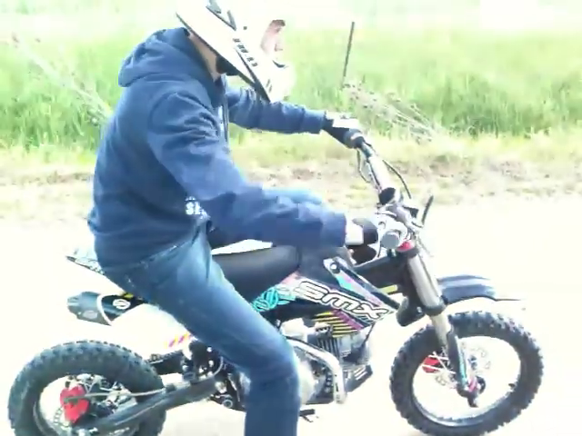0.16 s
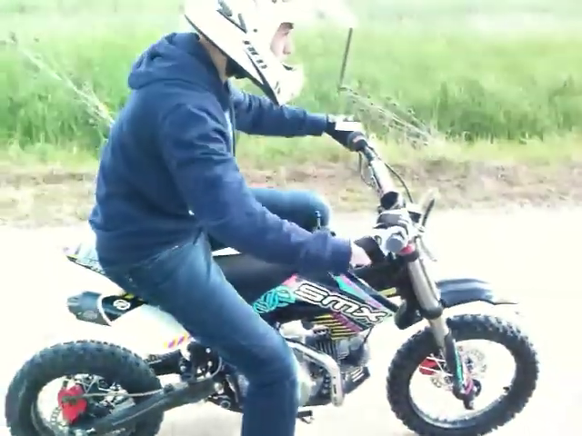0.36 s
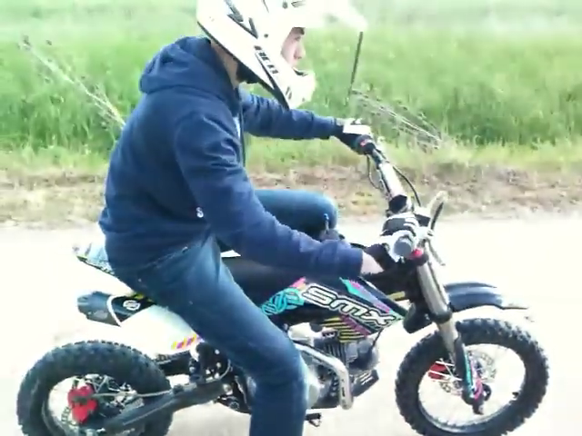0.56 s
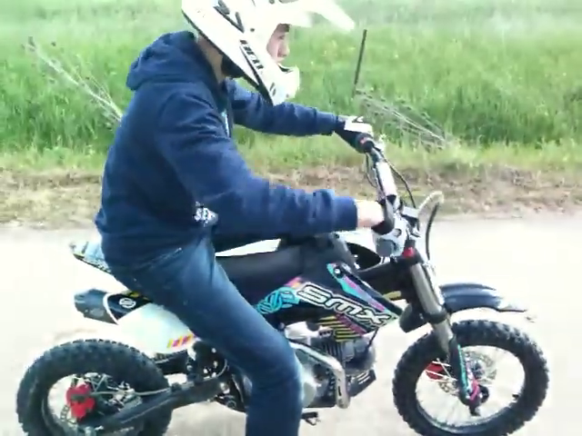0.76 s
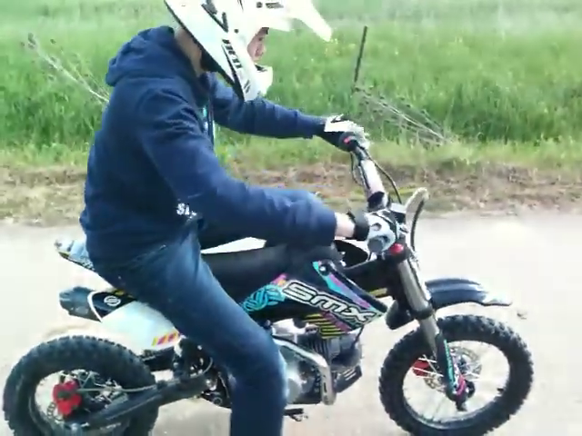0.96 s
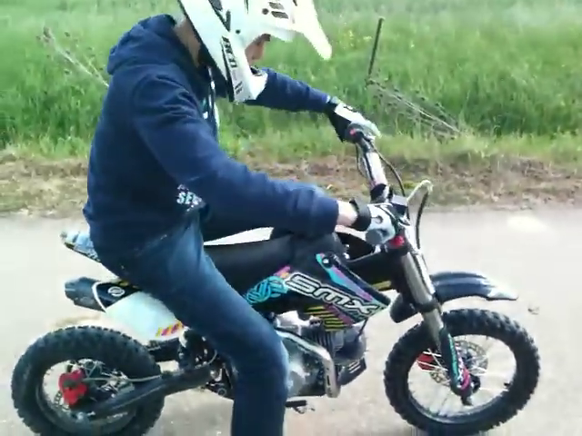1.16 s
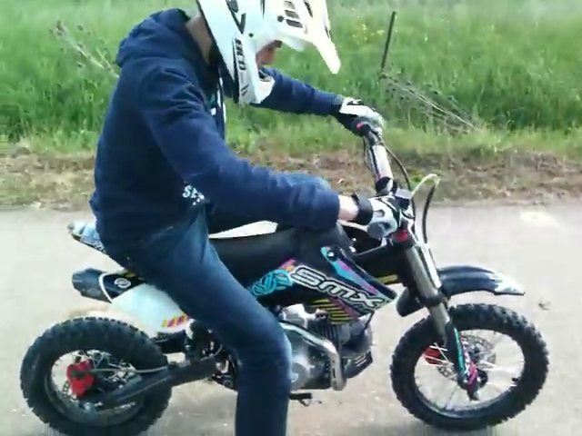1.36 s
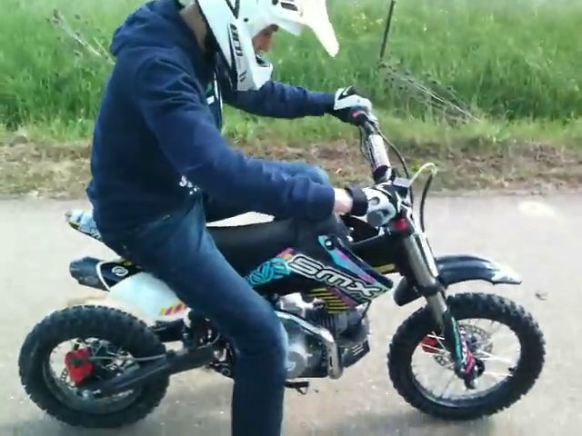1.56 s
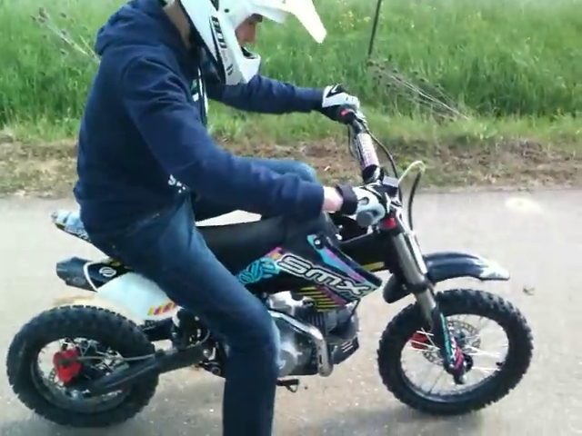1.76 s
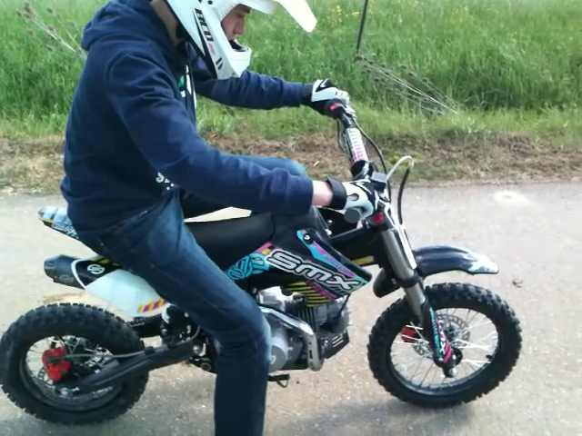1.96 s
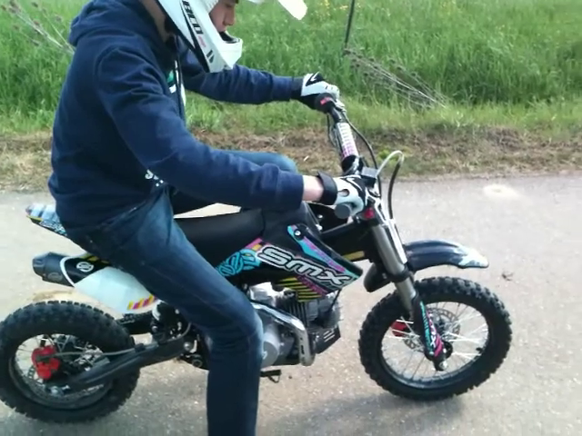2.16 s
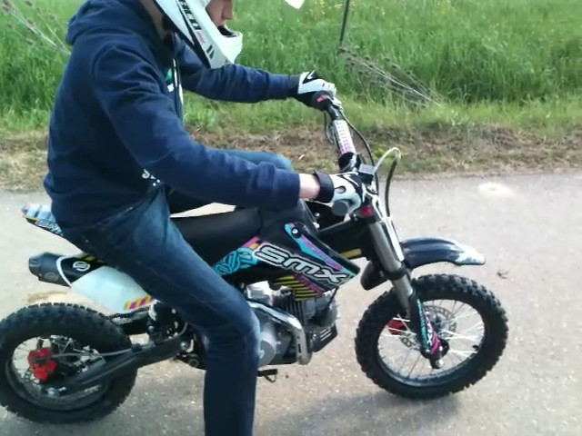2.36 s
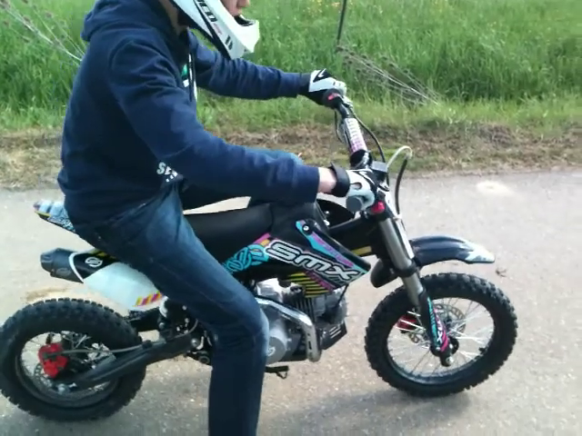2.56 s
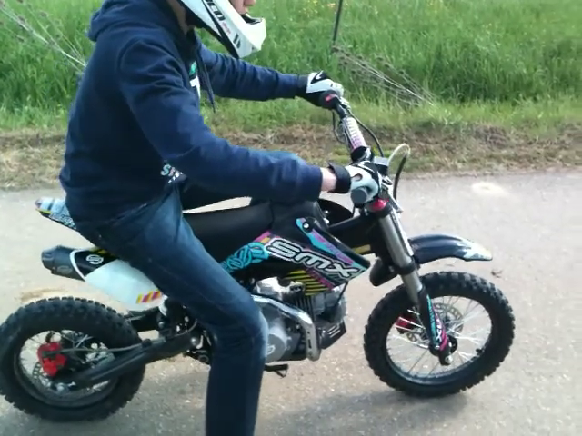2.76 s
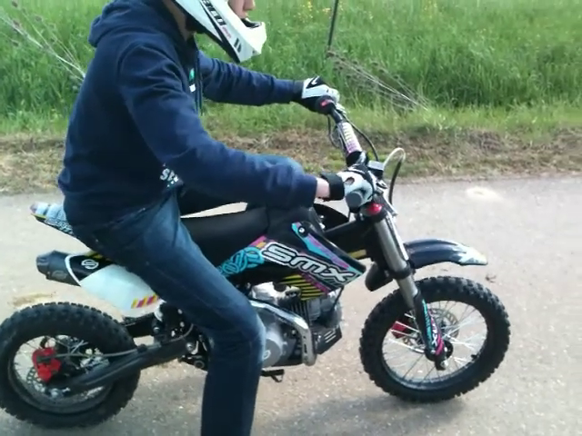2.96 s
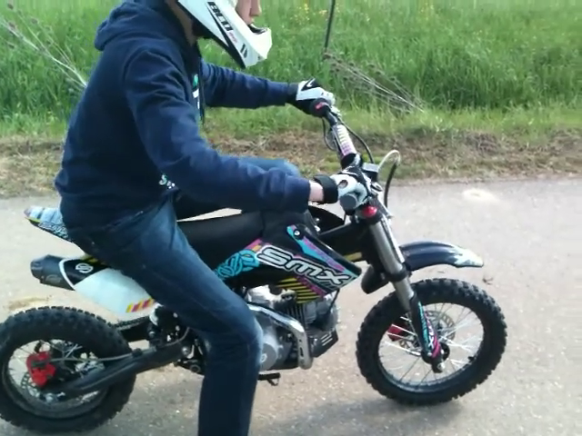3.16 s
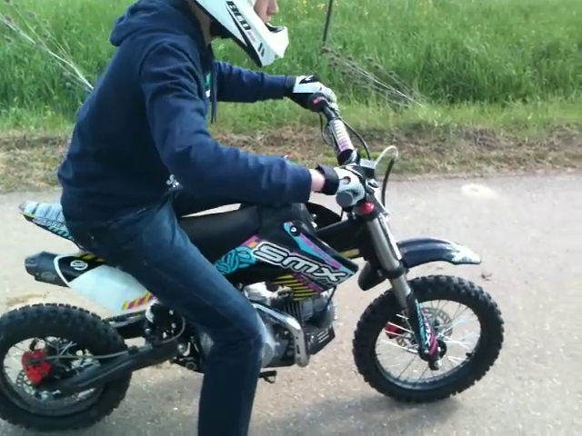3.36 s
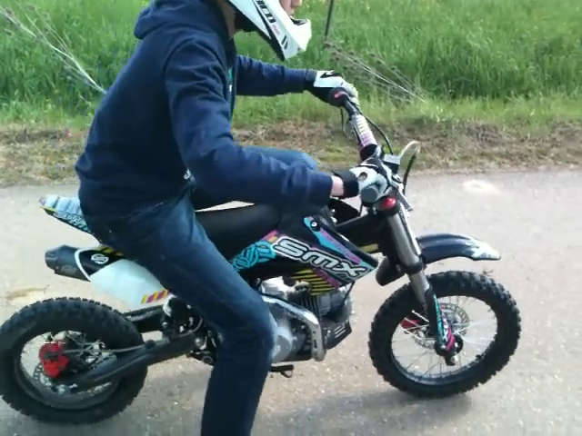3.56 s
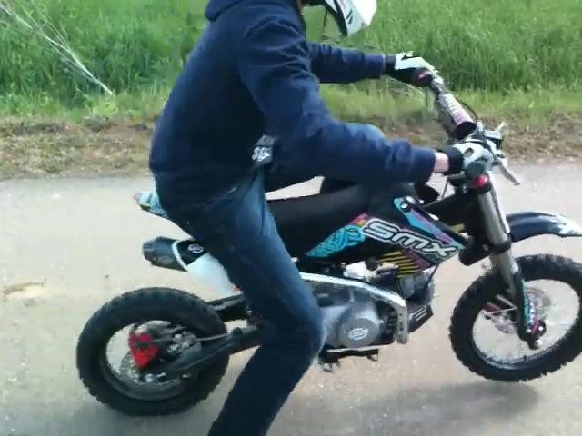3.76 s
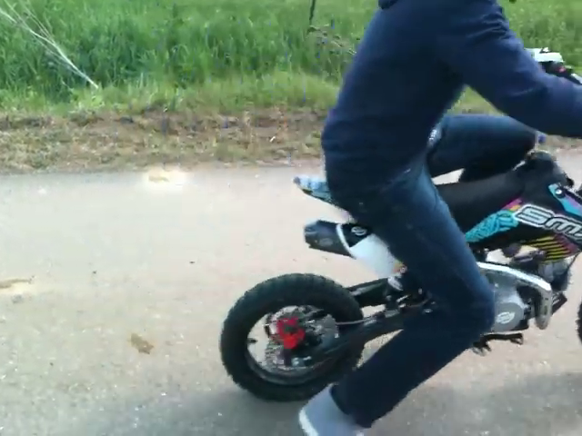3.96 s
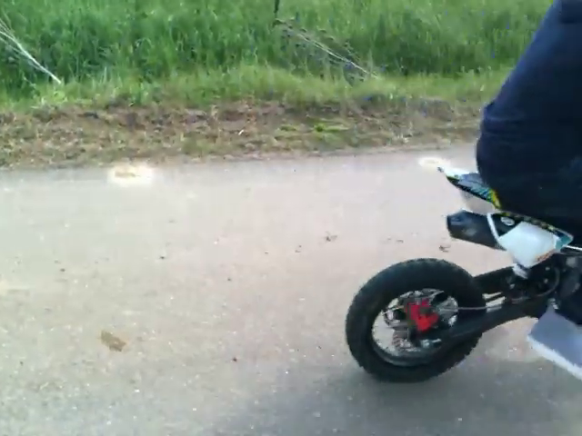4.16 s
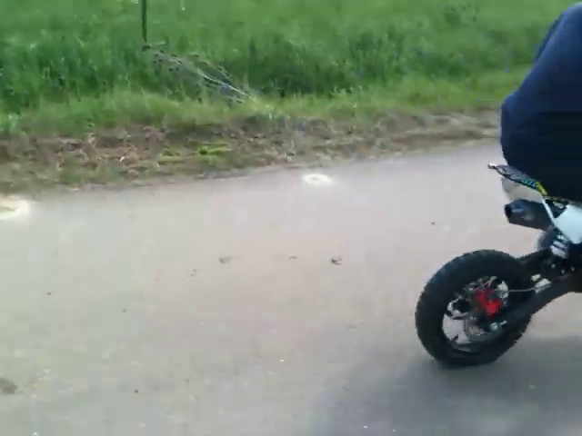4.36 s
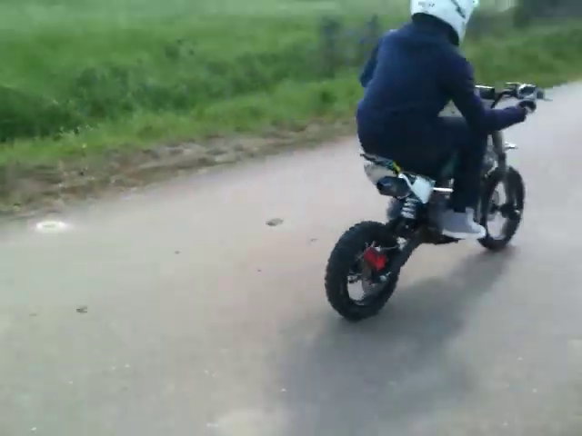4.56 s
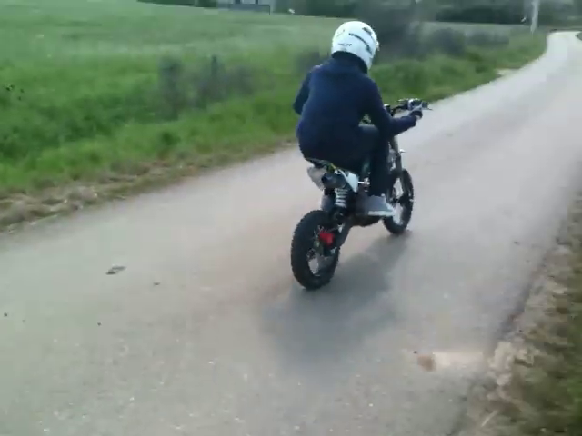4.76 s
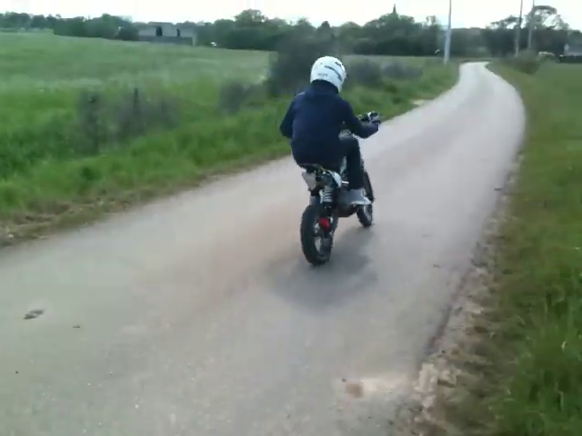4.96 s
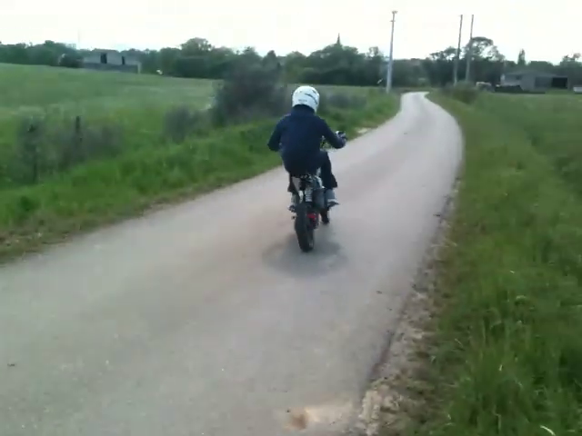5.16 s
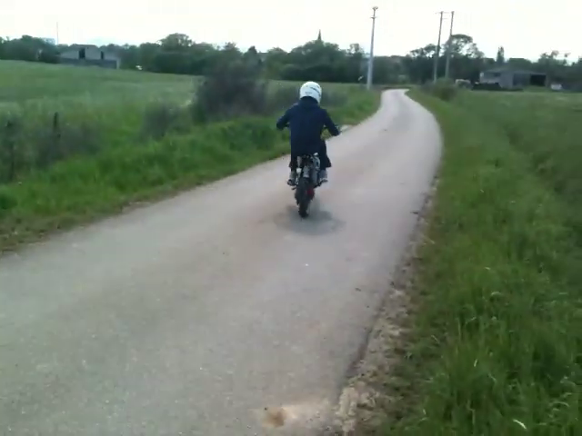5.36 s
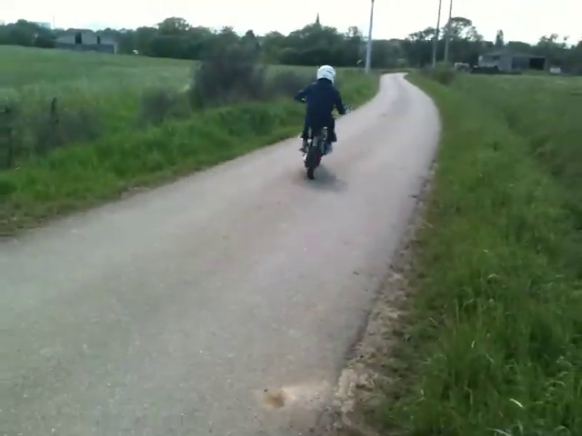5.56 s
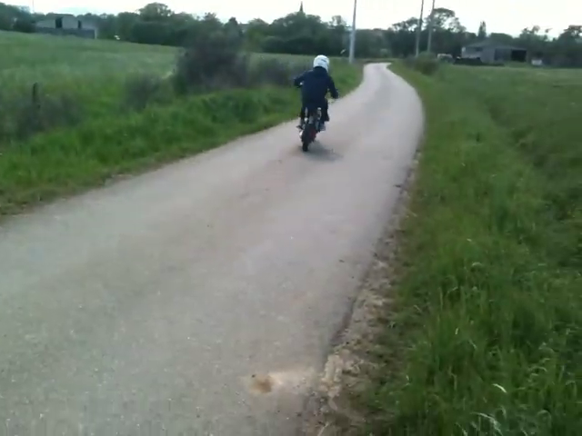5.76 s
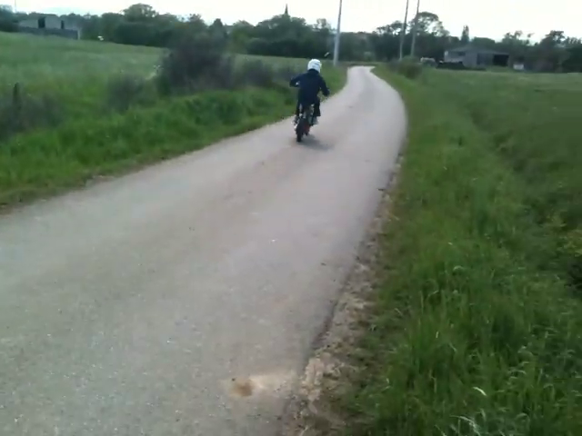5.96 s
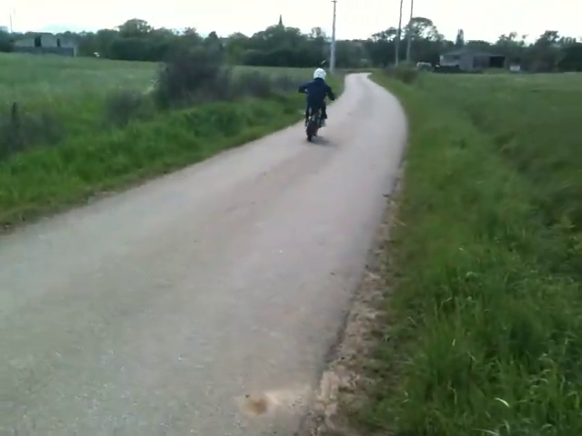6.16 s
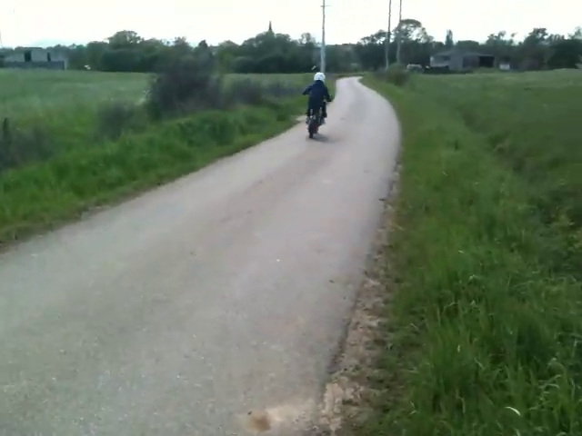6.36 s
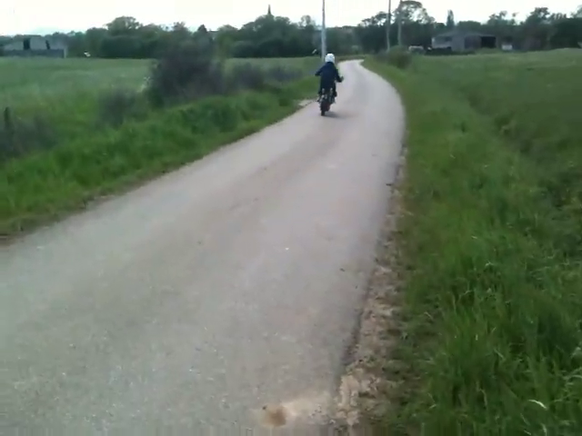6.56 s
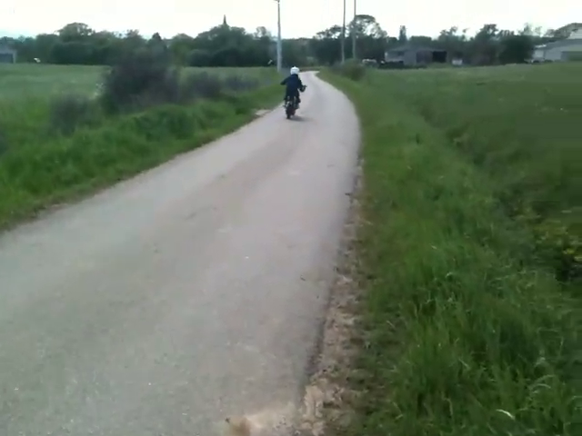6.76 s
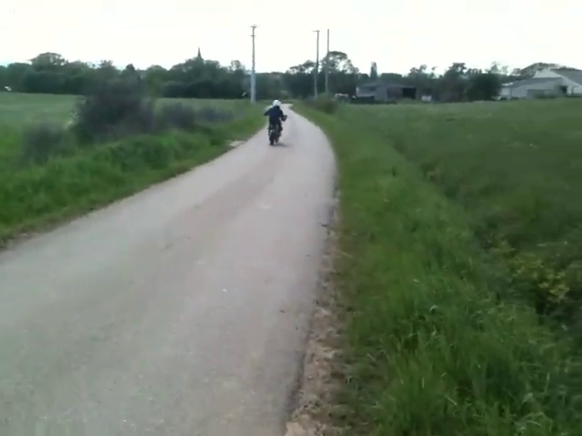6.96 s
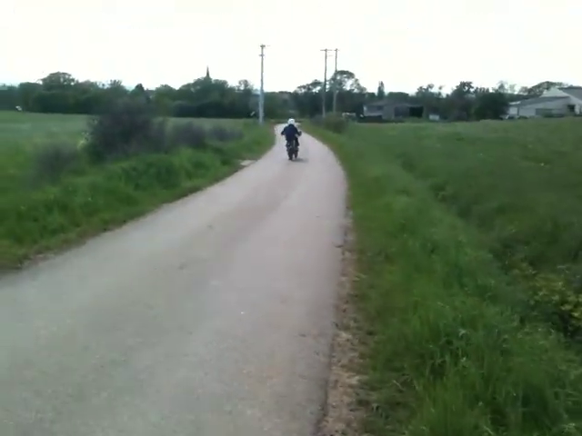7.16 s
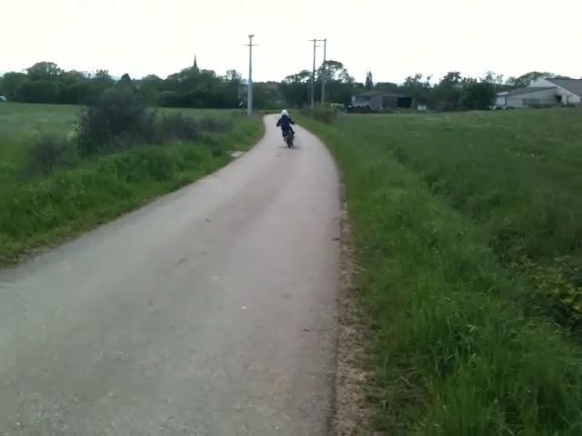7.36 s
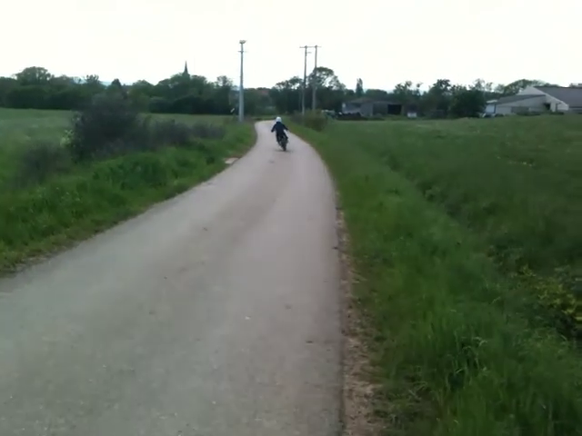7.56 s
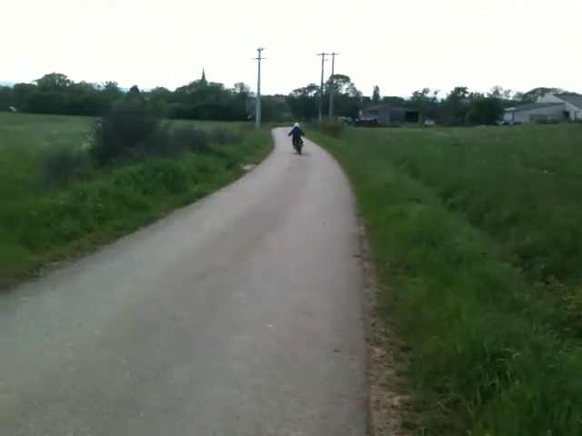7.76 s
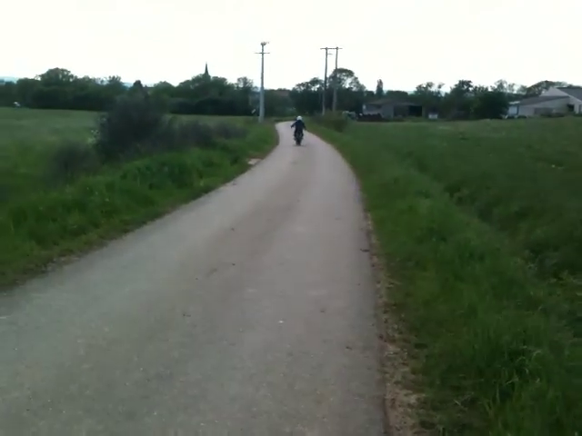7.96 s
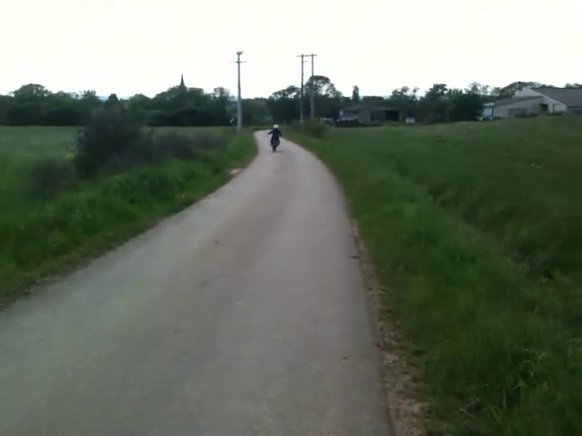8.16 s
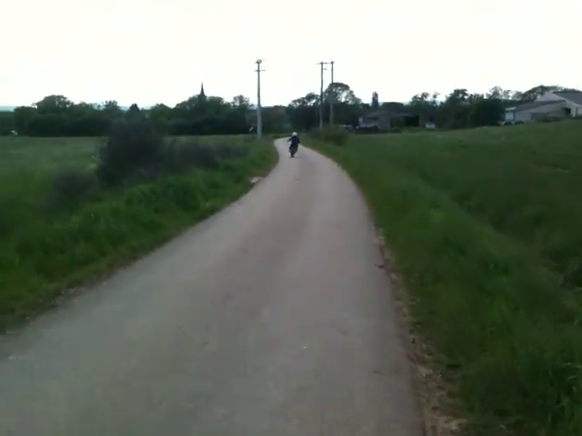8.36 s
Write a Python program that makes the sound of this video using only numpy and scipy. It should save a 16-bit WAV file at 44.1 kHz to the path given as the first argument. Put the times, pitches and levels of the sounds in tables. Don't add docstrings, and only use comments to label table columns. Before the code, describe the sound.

A small single-cylinder motorbike is revved twice with sharp barks and backfire pops, idles with a rattle, then accelerates hard away down a lane.

```python
import sys
import numpy as np
from scipy import signal
from scipy.io import wavfile
from scipy.ndimage import uniform_filter1d, map_coordinates

SR = 44100
rng = np.random.default_rng(int(sys.argv[2]) if len(sys.argv) > 2 else 0)


def inscribe(sig):
    pcm = np.round(np.clip(np.atleast_2d(sig).T, -1, 1) * 32767)
    wavfile.write(sys.argv[1], SR, pcm.astype(np.int16))


def voltage_ratio(level):
    return 10 ** (np.asarray(level, float) / 20)


N = 371763
T = np.arange(N) / SR
CLOCK = np.arange(0, N + 64, 32) / SR


def evened(x):
    return x / np.sqrt(np.mean(x ** 2) + 1e-20)


def curve(rows, s):
    return np.interp(s, np.transpose(rows)[0], np.transpose(rows)[1])


def fine(control):
    return np.interp(T, CLOCK, control)


def softened(x, hz):
    return signal.sosfiltfilt(signal.butter(2, hz, fs=SR, output="sos"), x)


def thin(points):
    return [(60, -45.5)] + list(points) + [(20000, -41)]


def coloured(x, points):
    hz, db = np.transpose(points)
    f = np.abs(np.fft.fftfreq(8192, 1 / SR))
    gain_db = np.interp(np.log(f + 1), np.log(hz), db)
    log_gain = np.log(voltage_ratio(np.maximum(gain_db, -100)))
    phase = -signal.hilbert(log_gain).imag
    taps = np.fft.ifft(np.exp(log_gain + 1j * phase)).real[:2048]
    return signal.oaconvolve(x, taps / np.linalg.norm(taps))[:N]


def ringing(x, modes):
    t = np.arange(2048) / SR
    taps = np.zeros(2048)
    for k, (hz, width_hz, db) in enumerate(modes):
        decay = np.sqrt(width_hz) * np.exp(-np.pi * width_hz * t)
        taps += (-1) ** k * voltage_ratio(db) * decay * np.sin(2 * np.pi * hz * t)
    return signal.oaconvolve(x, taps / np.linalg.norm(taps))[:N]


def clicks(s, size):
    at = s * SR
    index = np.floor(at).astype(int)[:, None] + np.arange(-8, 9)
    offset = index - at[:, None]
    out = np.zeros(N + SR)
    np.add.at(out, index + 16, size[:, None] * np.sinc(offset) * np.cos(np.pi * offset / 18) ** 2)
    return out[16:N + 16]


# time in seconds, distance in m.
DISTANCE_M = [(0, 2), (3.7, 2), (4.3, 3), (4.7, 5.5), (5, 8), (5.5, 12), (6, 18), (6.5, 33), (7, 50),
              (7.5, 64), (8.43, 100)]


def distance(s):
    return curve(DISTANCE_M, s)


# opens in seconds, shut in seconds, roll-on in seconds,
# roll-off in seconds, opening 0-1.
GRIP_TWISTS = [
    (-.03, .172, .05, .025, 1),
    (.268, .79, .04, .022, 1),
    (3.04, 3.345, .1, .075, .84),
    (3.59, 4.015, .03, .065, .86),
    (4.115, 9, .035, .05, 1),
]


def throttle():
    opening = np.zeros(len(CLOCK))
    for opens, shut, on, off, wide in GRIP_TWISTS:
        opening += wide * np.clip((CLOCK - opens) / on, 0, 1) * np.clip((shut - CLOCK) / off, 0, 1)
    return opening


def free():
    return throttle() * (CLOCK < GRIP_TWISTS[1][1])


# time in seconds, firings per second gained each second.
CRANK_PULL = [(0.0, 80.67), (0.158, 10.67), (0.289, 98.95), (0.37, 105.92), (0.65, 66.78), (0.785, 1.77),
              (1.71, -4.65), (2.04, 4.62), (2.365, -16.45), (2.537, 11.94), (2.77, 4.66), (3.07, 91.72),
              (3.305, -13.25), (3.625, 30.03), (3.7, -44.38), (3.788, 45.86), (3.956, -41.01),
              (4.04, 11.99), (4.118, 90.1), (4.27, 67.66), (4.47, 80.41), (5.22, 69.75), (5.67, 84.02),
              (6.036, 69.06), (6.254, -127.62), (6.39, -10.9), (6.493, 51.35), (6.73, 60.63), (7.83, 56.06),
              (8.259, 66.28)]


def speed():
    start_rate, drag_s = 61.41, 1.5
    s, pull = np.transpose(CRANK_PULL)
    since = np.maximum(CLOCK[:, None] - s, 0)
    steps = np.diff(pull, prepend=0) * drag_s
    return start_rate * np.exp(-CLOCK / drag_s) + (1 - np.exp(-since / drag_s)) @ steps


def turns():
    return np.cumsum(fine(speed())) / SR + .08


# time in seconds,
# level in dB.
AWAY_DB = [(4.5, 2), (5.1, -0.66), (5.8, -0.52), (6.25, -2), (6.65, -7.5), (7, -7), (7.5, -8), (8, -6.5),
           (8.43, -7)]


def level(shut_db, shut_rise, open_db, open_rise, top, share, far_db):
    octaves, grip = np.log2(speed() / 40), throttle()
    firing = open_db + open_rise * np.minimum(octaves, np.log2(top / 40))
    far = np.log2(np.maximum(distance(CLOCK) / 20, 1))
    engine = (1 - grip) * (shut_db + shut_rise * octaves) + grip * firing
    return engine + share * curve(AWAY_DB, CLOCK) + far_db * far


def roughness():
    rate, grip = speed(), throttle()
    shut = np.interp(rate, [35, 82], [.8, .3])
    firing = np.interp(distance(CLOCK), [6, 14, 35], [.23, .16, .08])
    sag = np.clip(-np.gradient(rate, CLOCK) / 150, 0, 1)
    return (1 - grip) * shut + grip * (firing + .2 * sag)


def blows(share, level_db, stir, puff_s, wobble_db):
    pipe_lag_s, jitter_s = .0035, 6e-5
    cycles = turns()
    s = np.interp(np.arange(1, int(cycles[-1])) + share, cycles, T) + pipe_lag_s
    chance = rng.standard_normal((len(s), 2))
    rough = stir * np.interp(s, CLOCK, roughness())
    s = s + jitter_s * rough * chance[:, 0]
    size = voltage_ratio(np.interp(s, CLOCK, level_db) + wobble_db * rough * chance[:, 1])
    size = size * np.sqrt(SR / np.interp(s, CLOCK, speed()))
    puff = np.exp(-np.arange(1500) / SR / puff_s)
    gate = signal.oaconvolve(clicks(s, size * rough), puff / np.linalg.norm(puff))[:N]
    return clicks(s, size * np.sqrt(1 - rough ** 2)) + gate * rng.standard_normal(N)


def whistle(share, level_db, hz, length_s):
    t = np.arange(0, length_s, 1 / SR)
    burst = np.sin(2 * np.pi * hz * t) * signal.windows.tukey(len(t), .5)
    drive = blows(share, level_db, stir=.6, puff_s=.002, wobble_db=6)
    return signal.oaconvolve(drive, burst / np.linalg.norm(burst))[:N]


def beats(level_db):
    shut, slow, fast = .04, .24, .42
    first = blows(0, level_db, stir=.3, puff_s=.006, wobble_db=3)
    idle = blows(.5, level_db, stir=.3, puff_s=.006, wobble_db=3)
    firing = np.interp(speed(), [30, 50], [slow, fast])
    return first + idle * fine(shut + throttle() * (firing - shut))


# Hz, width in Hz, level in dB. The law is as in level().
BOOM_MODE = [(134.4, 35, 0)]
BOOM_LAW = (-34, 2.5, -32, 4, 95, 1, -28)


def boom():
    stall = (1 - throttle()) * np.clip((28.7 - speed()) / 5, 0, 1)
    return ringing(beats(level(*BOOM_LAW) - 9.5 * free() - 8.5 * stall), BOOM_MODE)


# Hz, width in Hz, level in dB. The law is as in level().
PIPE_MODES = [(316, 91, 11.5), (439.7, 69, 8), (507, 370, 8), (166, 23, -2.5), (701, 36, -1)]
THUMP_LAW = (-36.5, 14, -24.5, 4, 95, 0.7, -3)


def thump():
    pipe = ringing(beats(level(*THUMP_LAW) - 3.5 * free()), PIPE_MODES)
    lead_s = .0016
    return np.roll(softened(pipe - boom() * voltage_ratio(-7), 814), -round(lead_s * SR))


GULP_LAW = (-91, 9, -42, 38.5, 59.5, 0, 0)


def gulp():
    return level(*GULP_LAW) - 15 * (distance(CLOCK) - 2)


SECOND_LAW = (-45, 18.5, -29.5, 23.5, 61.5, 0.75, -0.5)


def second():
    return level(*SECOND_LAW) - 16 * free() * np.clip((82 - speed()) / 7, 0, 1)


# delay in seconds, level in dB.
CRACK_LAW = (-64, 31, -22, 14, 63.5, 2.74, 3.58)
CAN_REFLECTIONS = [(.0013, -12), (.0021, -12), (.0036, -10)]


def fronts():
    out = blows(0, level(*CRACK_LAW) - 2.5 * free(), stir=1, puff_s=.003, wobble_db=3)
    out = out - blows(.33, second(), stir=1, puff_s=.004, wobble_db=3) * voltage_ratio(-3)
    out = out + blows(-.31, gulp(), stir=.87, puff_s=.011, wobble_db=-.5)
    behind = np.clip(distance(T) / 30 - .5, 0, 1)
    reflected = sum(voltage_ratio(db) * np.roll(out, round(s * SR)) for s, db in CAN_REFLECTIONS)
    return out + (1 - .52 * behind) * reflected


def shimmer():
    flutter = np.clip(evened(uniform_filter1d(rng.standard_normal(len(CLOCK)), size=8)), -2, 1.5)
    return voltage_ratio(fine(3 * flutter * np.minimum(distance(CLOCK) / 30, 1) + .5))


# extra path in m times distance in m, level in dB at grazing.
ROAD_ECHOES = [(2.753, -5)]


def outdoors(x):
    metres = distance(T)
    late = np.zeros(N)
    for path, db in ROAD_ECHOES:
        delay_s = path / metres / 343
        late += map_coordinates(x, [np.arange(N) - delay_s * SR], order=3) * voltage_ratio(db)
    return (x + late * metres / (metres + 5)) / 1.403


# Hz, level in dB per Hz.
NEAR_CRACK = [(300.0, 8.5), (600.0, -7), (1000.0, 0.5), (1300.0, -3.5), (1620.0, 0), (1900.0, -4.5),
              (2400.0, -23.5), (3200.0, -24), (4000.0, -30), (4900.0, -40.5), (6000.0, -35), (8000.0, -44),
              (11000.0, -48.5), (15500.0, -61)]
LEAVING_CRACK = [(300.0, -6.5), (600.0, -6.5), (1000.0, -4), (1300.0, -6.5), (1620.0, 5.5), (1900.0, -5),
                 (2400.0, -17), (3200.0, -35.5), (4000.0, -25.5), (4900.0, -15), (6000.0, -33),
                 (8000.0, -29.5), (11000.0, -32), (15500.0, -45.5)]
FAR_CRACK = [(300.0, -2.5), (600.0, 18), (1000.0, 9.5), (1300.0, 18.5), (1620.0, 6), (1900.0, 18),
             (2400.0, -3.5), (3200.0, -10), (4000.0, -15), (4900.0, 0.5), (6000.0, -20), (8000.0, -78),
             (11000.0, -41), (15500.0, -103)]
# time in seconds, treble in dB.
PIPE_AIM = [(0, 3), (4.1, 3), (4.5, -11), (5.1, -11.5), (5.75, -20.5), (5.85, -23), (6.6, -20), (7.5, -27),
            (7.75, 7), (8.43, 10.5)]


def crack():
    pulses, metres = fronts(), distance(T)
    near = np.clip((4.5 - metres) / 2, 0, 1)
    far = np.clip((metres - 15) / 16, 0, 1)
    out = coloured(pulses * near, thin(NEAR_CRACK))
    out = out + coloured(pulses * (1 - near - far), thin(LEAVING_CRACK))
    out = out + coloured(pulses * far, thin(FAR_CRACK))
    out = out - fine(free()) * softened(out, 325)
    low = softened(out, 2800)
    out = low + (out - low) * shimmer()
    treble = out - softened(out, 4370)
    treble_db = curve(PIPE_AIM, T) + 13 * fine(1 - throttle())
    return outdoors(out + treble * (voltage_ratio(treble_db) - 1))


# Hz, width in Hz, level in dB.
AIRBOX_MODE = [(368, 350, 0)]


def honk():
    snap = blows(-.26, gulp(), stir=.2, puff_s=.005, wobble_db=22)
    return softened(voltage_ratio(-4.5) * ringing(snap, AIRBOX_MODE), 600)


def hoot():
    return whistle(-.276, gulp() - 2.5 - .8 * np.maximum(speed() - 74.5, 0), 397, .0087)


def blip_howl():
    return whistle(-.1864, gulp() + 3, 1610, .0091)


# share of the cycle, level in dB, length in cycles.
TAPPETS = [
    (0.018, 4.5, 0.14),
    (.3, 11.5, 0.024),
    (0.552, -30, 0.027),
    (.8, -46, 0.016),
]
# Hz, level in dB per Hz.
CASES = [(300, -9.5), (600, -16.5), (1050, -17.5), (1520, -9), (1750, 4.5), (1960, -15), (2600, -26.5),
         (3500, -34), (4800, -18), (6000, -36), (8100, -28.5), (9500, -40), (11500, -37), (15500, -65)]
# Hz, width in Hz, level in dB. The law is as in level().
FINS = [(4930, 42, -37), (4440, 190, -11), (6640, 65, 3), (8120, 120, -24), (9800, 100, -19)]
GEAR_LAW = (-47, 10.5, -45.5, 11, 95, 1.2, 3.5)


def clatter():
    share = turns() % 1
    gate = .87 + sum(voltage_ratio(db) * np.exp(-((share - at) % 1) / length) for at, db, length in TAPPETS)
    ticks = voltage_ratio(.8 * np.minimum(rng.exponential(1, N), 4))
    ticks = ticks * (rng.random(N) < 8000 / SR) * rng.choice([-1, 1], N)
    drive = evened(gate * (evened(ticks) + 1.77 * rng.standard_normal(N)))
    drive = drive * voltage_ratio(fine(level(*GEAR_LAW)) + .05 * curve(PIPE_AIM, T))
    cases = voltage_ratio(12) * coloured(drive, thin(CASES)) + voltage_ratio(-30) * ringing(drive, FINS)
    dull, low = softened(cases, 3870), softened(cases, 2900)
    gone_m = np.minimum(distance(T) - 2, 30)
    coast = fine((1 - throttle()) * np.log2(np.maximum(speed() / 45, 1)))
    low_db = -9.5 * coast - .5 * gone_m
    return low * voltage_ratio(low_db) + (dull - low) * voltage_ratio(-.15 * gone_m) + (cases - dull) * voltage_ratio(-.45 * gone_m)


# Hz, level in dB per Hz.
BREEZE_COLOUR = [(12, -51), (20, -28), (64, -25), (97, -24), (110, -15.5), (140, -35), (240, -120)]


def breeze():
    lumps = evened(uniform_filter1d(rng.standard_normal(N), 6000))
    return voltage_ratio(-61 + 4.9 * lumps) * coloured(rng.standard_normal(N), BREEZE_COLOUR)


# time in seconds, peak in dB, Hz.
KNOCKS = [
    (0.277, -3, 382),
    (0.768, -1, 331),
    (1.764, -20, 1700),
    (2.005, -22, 1770),
    (2.429, -26, 1710),
    (2.671, -28, 1770),
]


def knocks():
    t, out = np.arange(1200) / SR, np.zeros(N)
    for s, db, hz in KNOCKS:
        pop = np.sin(2 * np.pi * hz * t) * np.exp(-t / .0024)
        gas = rng.standard_normal(len(t)) * np.exp(-t / .0027)
        pop = pop + 2.6 * coloured(gas, thin(NEAR_CRACK))[:len(t)]
        out[round(s * SR):][:len(t)] += voltage_ratio(db - 2) * pop / np.abs(pop).max()
    return out


# time in seconds, level in dB, fade in dB per second.
HOWLS = [
    (4.7, -10, 80),
    (5.051, -13, 75),
]


def howl():
    level_db = np.max([db - fade * np.abs(CLOCK - s) for s, db, fade in HOWLS], axis=0)
    return whistle(.024, level_db, 1666, .0061)


def sing():
    short_m = np.maximum(35 - distance(CLOCK), 0)
    return whistle(.012, level(*CRACK_LAW) - 3 - 3 * short_m, 1694, .00333)


def scene():
    bike = thump() + crack() + honk() + hoot() + blip_howl()
    bike = bike + clatter() + knocks() + howl() + sing()
    bike = signal.sosfilt(signal.butter(6, 99, "high", fs=SR, output="sos"), bike)
    return (bike + breeze())[None]


def top_cut(x):
    return signal.sosfilt(signal.butter(12, 15900, fs=SR, output="sos"), x)


def record(dry):
    knee = .73
    mix = dry / (1 + np.abs(dry / knee) ** 8) ** .125
    return top_cut(mix)


dry = scene()
out = record(dry)
inscribe(out)
```